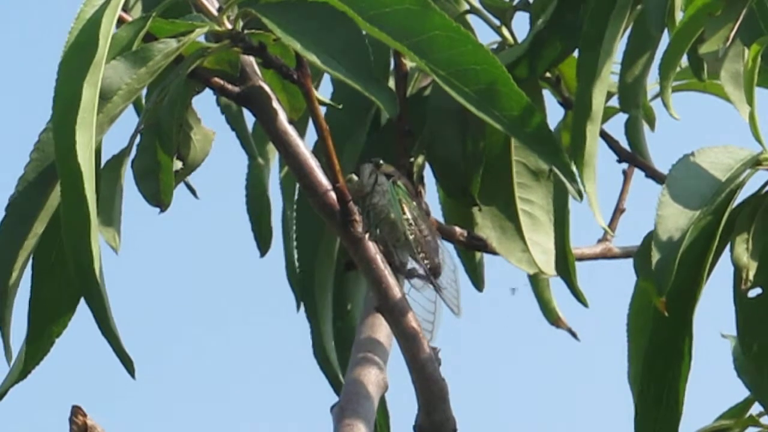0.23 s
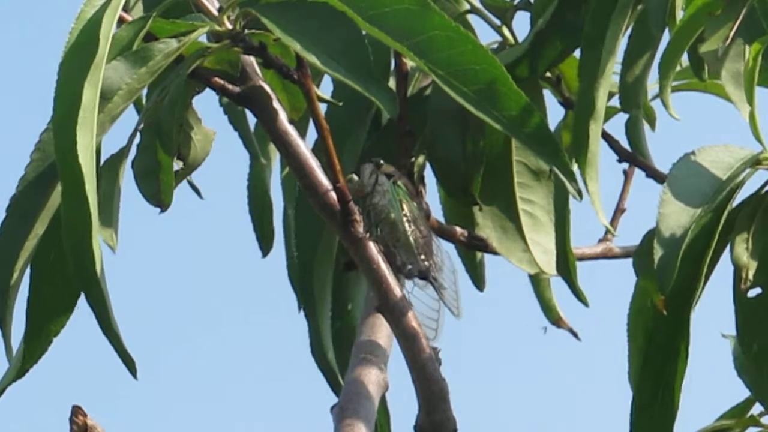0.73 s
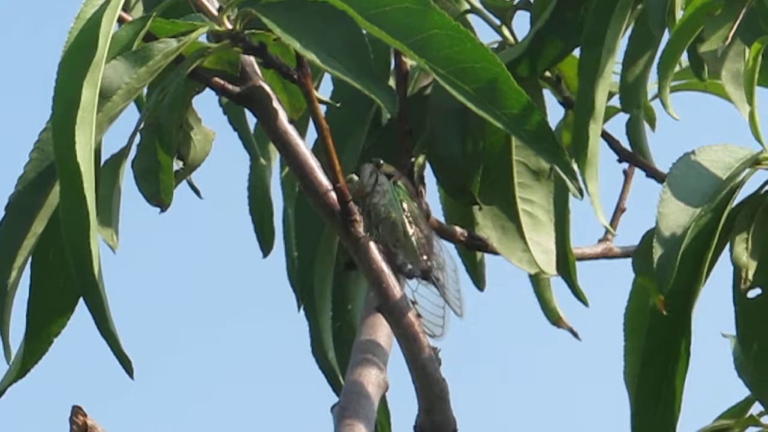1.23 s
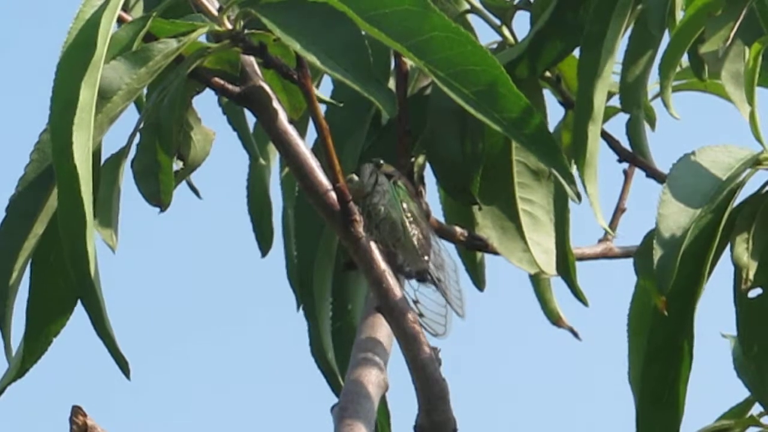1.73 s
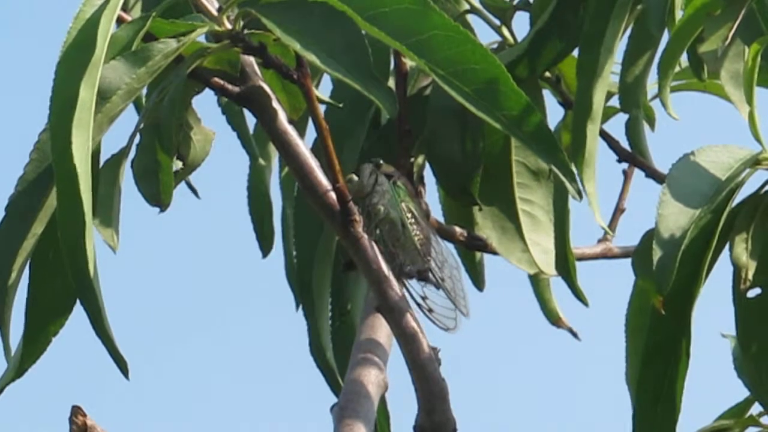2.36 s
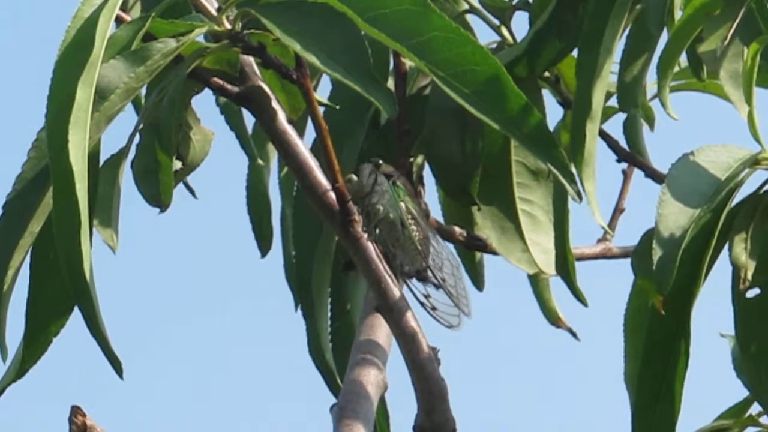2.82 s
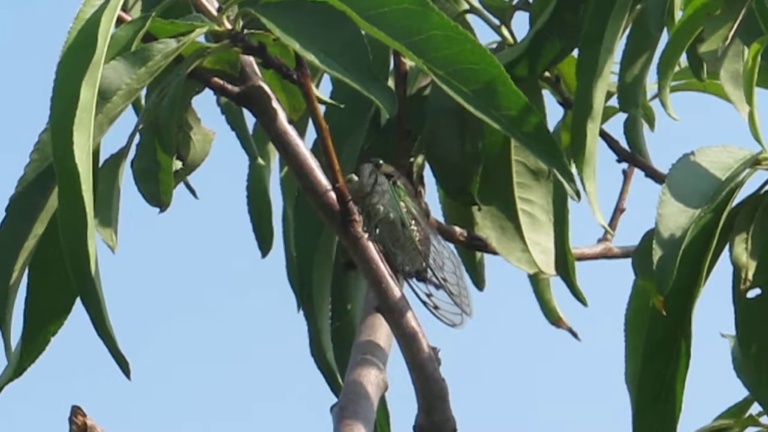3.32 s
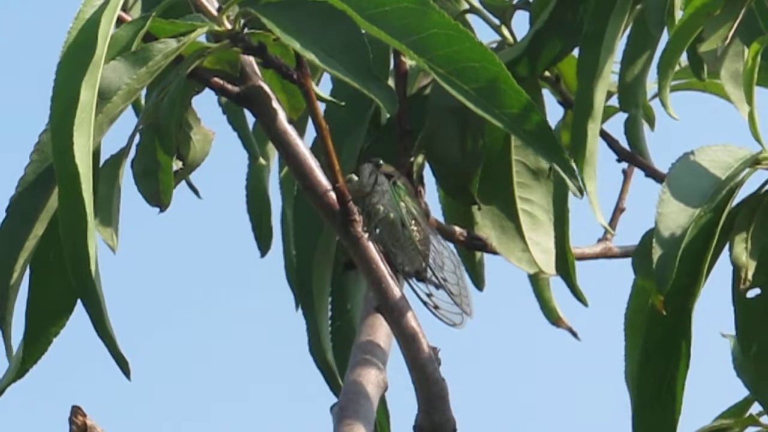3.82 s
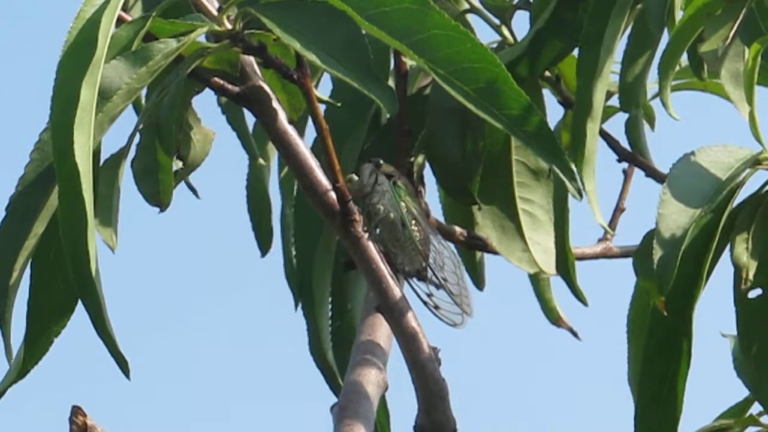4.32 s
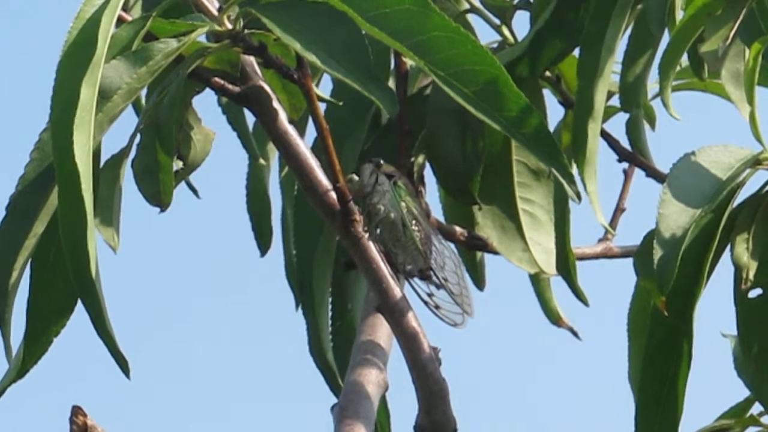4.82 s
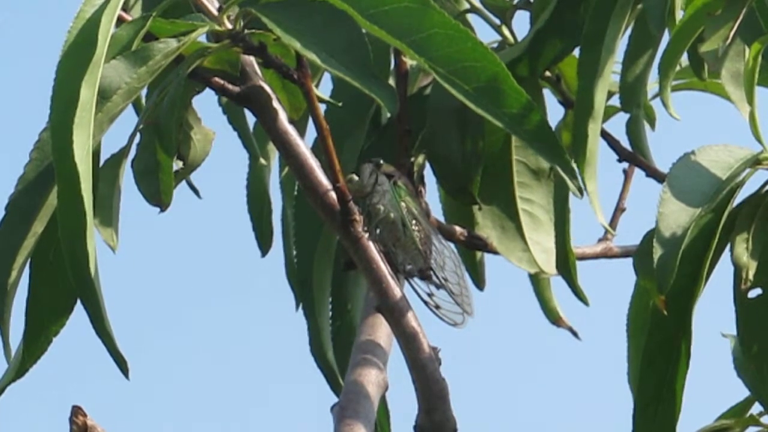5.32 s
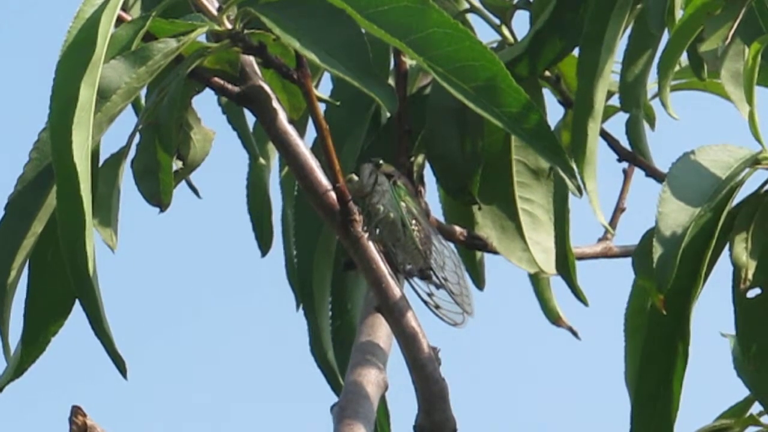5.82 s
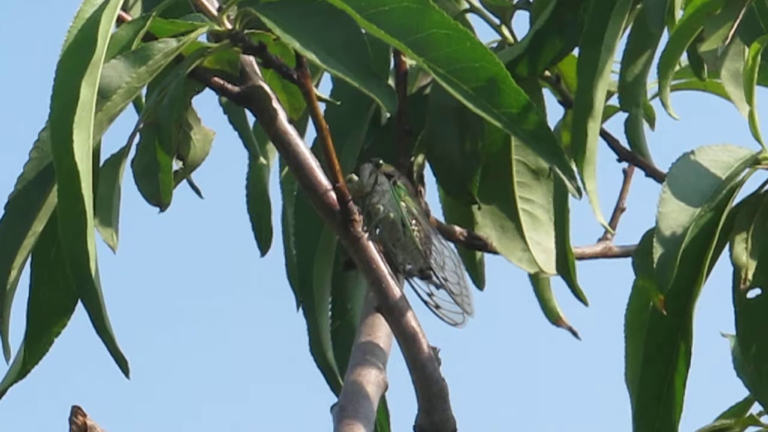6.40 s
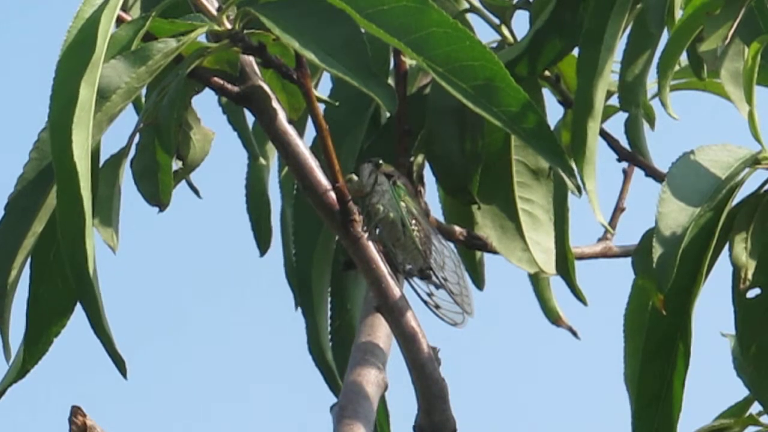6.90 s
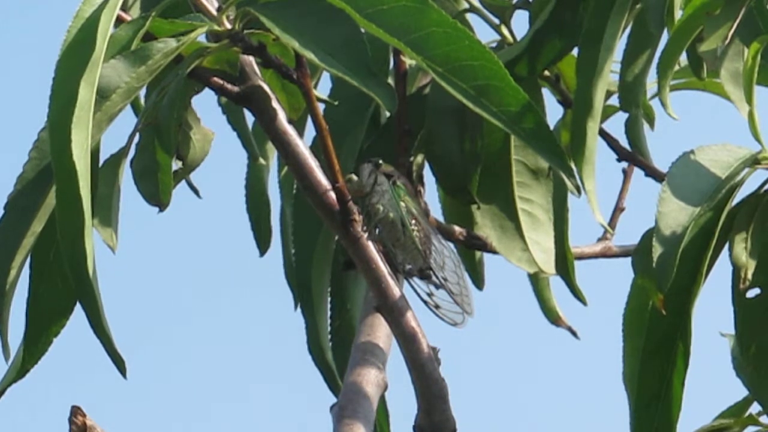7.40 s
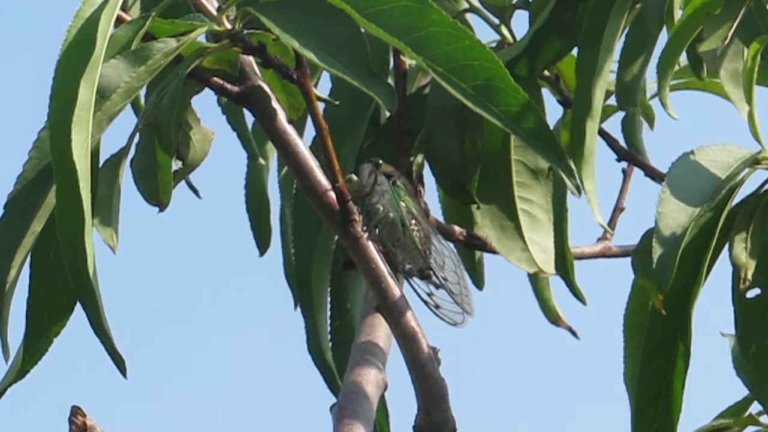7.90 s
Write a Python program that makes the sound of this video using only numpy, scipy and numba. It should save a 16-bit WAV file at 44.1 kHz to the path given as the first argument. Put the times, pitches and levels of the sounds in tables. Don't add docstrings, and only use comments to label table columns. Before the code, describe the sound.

A nearby cicada dominates the first half with a piercing, throbbing buzz. Its individual clicks spread apart, becoming a raspy ratchet, then it stutters in tiny runs and cuts off. The automatic gain has crept up meanwhile, so the second half is a soft open-air bed of low road rumble, uneven far engine drone, faint trilling and chirping insects, and a few barely audible low gliding notes.

```python
import sys
import numpy as np
from scipy import signal
from scipy.fft import rfft, irfft
from scipy.io import wavfile
from scipy.ndimage import uniform_filter1d
from numba import njit

SR = 44100
rng = np.random.default_rng(int(sys.argv[2]) if len(sys.argv) > 2 else 0)


def linear_from_db(decibels):
    return 10 ** (np.asarray(decibels, float) / 20)


def unload_wav(signal):
    wavfile.write(
        sys.argv[1],
        SR,
        np.round(np.clip(np.atleast_2d(signal).T, -1, 1) * 32767).astype(np.int16),
    )


N = 359856
FRESH_PER_S, SPENT_PER_S = 212, 98


def colour(x, table, modes=(), size=1024):
    f = np.arange(size // 2 + 1) * SR / size
    hz, db = np.transpose(table)
    db = np.interp(np.log(f + 1), np.log(hz), db)
    for centre, width, peak_db in modes:
        db = db + peak_db / (1 + (2 * (f - centre) / width) ** 2)
    causal = np.r_[1, 2 * np.ones(size // 2 - 1), 1, np.zeros(size // 2 - 1)]
    fold = irfft(db * np.log(10) / 20) * causal
    return signal.fftconvolve(x, irfft(np.exp(rfft(fold))))[:N]


def unit(x):
    return x / np.sqrt(np.mean(x ** 2))


def clicks(times, sizes):
    at = np.clip(times * SR, 0, N - 2)
    whole = at.astype(int)
    part = at - whole
    return np.bincount(whole, sizes * (1 - part), N) + np.bincount(whole + 1, sizes * part, N)


def walk(rate):
    k = int(SR / rate)
    held = np.repeat(rng.standard_normal(N // k + 1), k)
    return unit(uniform_filter1d(uniform_filter1d(held, k), k)[:N])


@njit
def resonator(x, hz, width):
    y, b, l = np.empty(len(x)), 0., 0.
    for i in range(len(x)):
        g, k = np.tan(np.pi * hz[i] / SR), width / hz[i]
        v = (b + g * (x[i] - l)) / (1 + g * (g + k))
        b, l, y[i] = 2 * v - b, l + 2 * g * v, k * v
    return y


def tire(tired, fresh, spent, bend):
    return fresh + (spent - fresh) * tired ** bend


def tymbal_ribs(t, rate, tired):
    # first stroke in seconds, last stroke in seconds, level in dB.
    stutter = [
        (3.951, 4.010, 0.5),
        (4.023, 4.073, 0),
        (4.088, 4.198, 0),
        (4.217, 4.255, -1),
        (4.281, 4.298, -4),
        (4.312, 4.312, -0.5),
    ]
    pairing_s = (2.7, 3.8)
    runs = [np.linspace(a, b, round((b - a) * SPENT_PER_S) + 1) for a, b, _ in stutter]
    last = np.concatenate(runs)
    last_db = np.repeat(np.transpose(stutter)[2], [len(r) for r in runs])
    beat = np.interp(np.arange(1000), np.cumsum(rate) / SR, t)
    beat = np.r_[beat[beat < last[0] - .003], last]
    size = linear_from_db(np.r_[np.zeros(len(beat) - len(last)), last_db])

    wait = np.interp(beat, pairing_s, (.48, .3)) / np.interp(beat, t, rate)
    stroke = np.r_[beat, beat + wait]
    rebound = stroke + np.r_[wait, wait] / 2
    size = np.r_[size, np.interp(beat, pairing_s, (0.79, 0.7)) * size]

    chance = rng.standard_normal((1000, 8, 2))[:len(beat)]
    chance = chance.T.transpose(1, 0, 2).reshape(8, -1)
    uneven_db = np.interp(stroke, t, tire(tired, 1, 1.6, 1.2))
    belly_ribs, plate_ribs = np.zeros(N), np.zeros(N)
    for k, (ms, db) in enumerate([(.3, 0), (.7, -6)]):
        when = stroke + ms / 1000 + 0.00012 * chance[k]
        belly_ribs += clicks(when, size * linear_from_db(db + uneven_db * chance[k + 4]))
    for k, (ms, db) in enumerate([(.3, 0), (1.5, -9)]):
        when = rebound + ms / 1000 + 0.000141 * chance[k + 2]
        plate_ribs += clicks(when, size * linear_from_db(db + 0.79 * chance[k + 6]))
    return belly_ribs, plate_ribs


def belly_note(cycle, tired):
    top_hz = tire(tired, 7100, 4930, 0.34)
    low_hz = tire(tired, 3040, 3290, 0.41)
    dip = np.sin(np.pi * np.clip(cycle / 0.804, 0, 1) ** 1.01) ** 0.81
    return top_hz - (top_hz - low_hz) * dip


def pump_swell(t, pumps, tired):
    # time in seconds, depth of the pause in dB; the pause slowly fills in.
    pause = [(.85, -11.5), (1.1, -7), (2.1, -1)]
    swell_db = tire(tired, 8, 3, 2.1)
    lead_in = tire(tired, 0, 1.1, 0.39)
    hold = tire(tired, 0.24, .24, .4)
    since = (pumps % 1 + .07) % 1
    left = 1 - since
    shape = np.exp(-(since / hold) ** 3)
    shape += np.minimum(lead_in, 1) * np.exp(-(left / 0.16) ** 2)
    shape += 0.45 * np.exp(-((since - .68) / 0.14) ** 2)
    scatter = 1 + 0.42 * rng.standard_normal(80)[(pumps + .5).astype(int)]
    depth_db = np.interp(t, *np.transpose(pause)) * scatter
    return swell_db * shape + depth_db * np.exp(-(left / 0.17) ** 3)


def microphones(voice, t):
    # time in seconds, nearer delay in ms, farther delay in ms; they move as the camera settles.
    drift = [(0, 1.6, 1.9), (.45, 1.46, 2.06), (1.0, 1.11, 1.83), (1.3, 1.04, 1.705), (4.4, 1.054, 1.691)]
    # nearer reflection in dB, farther in dB.
    echo = [(-23.5, -10), (-15.5, -15.5)]
    # resonance in Hz, width in Hz, left peak in dB, right peak in dB.
    body_modes = [(4750, 330, 9, 5), (6300, 600, 4, 5.5), (6900, 350, 2, 2), (4200, 250, 2, 2)]
    # frequency in Hz, gain in dB.
    song_left = [(2000, -18), (2600, -10), (3200, -6.5), (4000, -3), (4400, -2), (5300, 2), (5800, 1),
                 (6900, -12.5), (7600, -25), (8500, -20), (9500, -40), (11000, -29.5), (13000, -42),
                 (15000, -47.5)]
    song_right = [(2000, -11), (2600, -10), (3200, -5), (4000, -3.5), (4400, -3.5), (5300, -2), (5800, 3.5),
                  (6900, -3.5), (7600, -4), (8400, -5.5), (9500, -15), (11000, -18.5), (13000, -22.5),
                  (15000, -47)]
    low_cut = signal.butter(3, 2100, "high", fs=SR, output="sos")
    sway = 2 * np.pi * 0.5015 * t
    ears = []
    for side, table in enumerate((song_left, song_right)):
        tail = rng.standard_normal((2, 900)) * np.exp(-np.arange(900) / SR / .003)
        tail = tail / np.sqrt(np.sum(tail ** 2) / 2)
        tail = signal.fftconvolve(voice[None], tail, axes=1)[:, :N]
        heard = voice + linear_from_db(-7.5) * (np.cos(sway) * tail[0] + np.sin(sway) * tail[1])
        for db, ms in zip(echo[side], np.transpose(drift)[1:]):
            late = np.arange(N) - np.interp(t, np.array(drift)[:, 0], ms) * SR / 1000
            heard += linear_from_db(db) * np.interp(late, np.arange(N), voice)
        heard = signal.sosfilt(low_cut, heard)
        ears.append(colour(heard, table, [(m[0], m[1], m[2 + side]) for m in body_modes]))
    ears[0] = np.roll(ears[0], 1)
    return np.array(ears)


def cicada(t):
    # time in seconds, strokes per second, level in dB.
    song = [(0, 200, -27.5), (.4, 208, -28), (.6, 209, -27), (1.0, 210, -28.5), (1.6, 190, -30),
            (2.0, 168, -28.5), (2.4, 145, -29), (2.8, 122, -29.5), (3.25, 101, -29.5), (3.32, 129, -27.5),
            (3.6, 114, -28), (4.0, 99, -27), (4.4, 97, -28)]
    # time in seconds with the belly fully open, pumps so far.
    pump = [(-.019, 0), (.230, 4), (.581, 10), (.921, 16), (1.239, 22), (2.472, 45), (2.806, 51),
            (3.157, 57), (3.283, 59), (3.496, 63), (3.793, 68), (4.23, 75), (4.31, 76), (4.4, 77)]
    song_s, song_rate, song_db = np.transpose(song)
    rate = np.interp(t, song_s, song_rate)
    level_db = np.interp(t, song_s, song_db)
    tired = np.clip((FRESH_PER_S - rate) / (FRESH_PER_S - SPENT_PER_S), 0, 1)
    belly_ribs, plate_ribs = tymbal_ribs(t, rate, tired)

    pumps = np.interp(t, *np.transpose(pump))
    belly_hz, plate_hz = belly_note(pumps % 1, tired), np.full(N, 6900.)
    belly = resonator(resonator(belly_ribs, belly_hz, 1500.), belly_hz, 1500.)
    plate = resonator(resonator(plate_ribs, plate_hz, 3200.), plate_hz, 3200.)
    knock = resonator(belly_ribs, np.full(N, 3600.), 1020.)
    edge = np.diff(belly_ribs - plate_ribs, prepend=0)
    high_pass = signal.butter(4, 9000, "high", fs=SR, output="sos")
    snap = signal.sosfilt(high_pass, belly_ribs + plate_ribs)

    voice = linear_from_db(tire(tired, -0.5, -4.5, 4)) * unit(belly)
    voice += linear_from_db(tire(tired, 5, 3.5, 1.9)) * unit(plate)
    voice += linear_from_db(tire(tired, -11, -0.5, 1.1)) * unit(knock)
    voice += linear_from_db(-12) * unit(edge)
    voice += linear_from_db(tire(tired, -2, 6.5, 1.2) + 3.5) * unit(snap)
    voice *= linear_from_db(pump_swell(t, pumps, tired))
    ring_gain = linear_from_db(np.interp(t, (0.61, 1.27), (-4, 0.5)))
    voice += (ring_gain - 1) * resonator(voice, np.full(N, 4700.), 300.)
    return unit(microphones(voice, t)) * linear_from_db(level_db + 3.0)


def chirps(times, db, hz0, hz1, length_s, buzz_hz=0., buzz=0., rough=0., spread=.01):
    u = np.arange(int(length_s * SR)) / SR
    out = np.zeros(N + len(u))
    glide = hz0 * u + (hz1 - hz0) * u ** 2 / (2 * length_s)
    chance = rng.standard_normal((len(times), 2))
    for s, gain, (detune, turn) in zip(times - length_s / 2, linear_from_db(db), chance):
        tone = np.sin(2 * np.pi * (1 + spread * detune) * glide)
        shape = np.sin(np.pi * u / length_s) ** 0.58
        shape *= 1 + buzz * np.cos(2 * np.pi * buzz_hz * u + 3 * turn)
        grit = np.convolve(rng.standard_normal(len(u)), np.hanning(70), "same")
        shape *= 1 + rough * unit(grit)
        i = int(s * SR)
        if 0 <= i < N:
            out[i:i + len(u)] += gain * tone * shape
    return out[:N]


def fast_chirper():
    strokes = 0.0068 + np.arange(240) / 29.3
    chance = rng.standard_normal((240, 2)).T
    times = strokes + .0008 * chance[0]
    fast = chirps(times, -3.0 + 0.74 * chance[1], 8630, 7640, .015, 200.0, 0.32, rough=0.28)
    tick = clicks(strokes - .006, linear_from_db(-16 + 6 * rng.standard_normal(240)))
    scrape = rng.standard_normal(200) * np.exp(-np.arange(200) / 90)
    tick = resonator(np.convolve(tick, scrape)[:N], np.full(N, 11000.), 4600.0)
    return fast, tick


def trillers():
    high_trill = [4.426, 4.6, 4.772, 4.93, 5.073, 5.257, 5.542, 5.737, 5.862, 6.026, 6.164, 6.322, 6.593,
                  6.727, 6.864, 7.24, 7.38, 7.752, 8.056]
    low, high = .058 + np.arange(45) / 5.508, np.array(high_trill)
    low_db, high_db = np.full(45, -59.5), -53 - 4.5 * (high - high[0])
    return [chirps(s, db + 35.5, hz, hz * .99, 0.062, 141.85, 0.64, rough=0.6, spread=.003)
            for s, db, hz in ((low, low_db, 9050), (high, high_db, 9850))]


def far_buzzer():
    beats = np.arange(640) / 77.3
    db = -10.5 + 3.5 * np.sin(2 * np.pi * 12.3 * beats) + 1.5 * rng.standard_normal(640)
    db += 3 * np.exp(-((beats - 6.2) / 0.64) ** 2)
    return chirps(beats, db, 6120, 5286, .006, spread=.025)


def insects():
    fast, tick = fast_chirper()
    low, high = trillers()
    far = far_buzzer()
    left = linear_from_db(-26.0) * fast + low + linear_from_db(-18.0) * high + np.roll(far, 5)
    right = fast + tick + linear_from_db(7.0) * low + high + linear_from_db(-4.5) * far
    pair = np.array([left, right])
    tail = rng.standard_normal((2, 3000)) * np.exp(-np.arange(3000) / SR / 0.015)
    return pair + linear_from_db(-47) * signal.fftconvolve(pair, tail, axes=1)[:, :N]


def low_notes():
    # time in seconds, level in dB, start in Hz, end in Hz, length in seconds.
    coos = [
        (5.08, -37, 352, 360, .2),
        (5.766, -37.5, 239, 253, .22),
        (6.11, -37.5, 252, 257, .2),
        (6.353, -41, 340.6, 347, .2),
    ]
    return sum(chirps(np.array([s]), np.array([db]), *note) for s, db, *note in coos)


def engine_hum(t, gain_db):
    # pull starts in seconds, ends in seconds, rise in dB.
    hum_load = [
        (1.5, 2.25, 7),
        (2.45, 3.5, 4),
        (3.6, 4.751, 10.5),
        (6.3, 7.1, 4),
        (7.25, 7.6, 3),
        (7.65, 8.3, 15.5),
    ]
    hum_hz = 143.8 - 2.2 * np.maximum(t - 5.0, 0)
    ramp_s = 0.059
    load_db = sum(db * np.clip(np.minimum(t - a, b - t) / ramp_s + .5, 0, 1) for a, b, db in hum_load)
    tone = np.sin(2 * np.pi * np.cumsum(hum_hz + 1.524 * walk(8.1)) / SR)
    return tone * linear_from_db(gain_db - 6 + load_db + 2.5 * walk(7.6))


def traffic(t):
    # heavy vehicle's time in seconds, bass swell in dB.
    rumble = [(.2, 3), (2.1, 3), (3.1, 3), (3.5, 5), (4.0, 6), (4.55, 4), (5.2, 5), (6.15, 3.5), (7.1, 2),
              (7.7, 1), (8.05, 3.5)]
    # frequency in Hz, likeness of left and right 0-1.
    likeness = [(60, 1), (300, 1), (640, 0.98), (1400, 0.9), (3000, 0.4), (5000, 0.16), (9000, 0.3)]
    # frequency in Hz, level in dB per Hz.
    road_left = [(30, -2.5), (60, 9.5), (120, 9), (200, -2), (450, -4.5), (800, 1), (1400, -4.5),
                 (2500, -17), (4000, -23.5), (6000, -22.5), (7500, -36), (9500, -41), (11000, -45),
                 (15000, -48)]
    road_right = [(30, 2), (60, 12.5), (120, 12), (200, 0), (450, -3.5), (800, 2.5), (1400, -2),
                  (2500, -15), (4000, -27), (6000, -22), (7500, -20.5), (9500, -31.5), (11000, -39.5),
                  (15000, -46)]
    rumble_db = sum(db * np.exp(-((t - s) / 0.19) ** 2) for s, db in rumble)
    f = np.arange(N // 2 + 1) * SR / N
    like_hz, like = np.transpose(likeness)
    like = np.clip(np.interp(np.log(f + 1), np.log(like_hz), like), 0, 1)
    lag_samples = 3 + 3 / (1 + (f / 500) ** 2)
    late = np.exp(-2j * np.pi * f / SR * lag_samples)
    bass = 1 / (1 + (f / 160) ** 4)
    shared, ears = rng.standard_normal(N), []
    for lag, table in ((late, road_left), (1, road_right)):
        noise = np.sqrt(like) * rfft(shared) * lag
        noise = noise + np.sqrt(1 - like) * rfft(rng.standard_normal(N))
        hz, db = np.transpose(table)
        noise = noise * linear_from_db(np.interp(np.log(f + 1), np.log(hz), db, left=-8))
        ears.append(irfft(noise * (1 - bass), N) + irfft(noise * bass, N) * linear_from_db(rumble_db))
    return np.array(ears)


def camera_gain(t):
    start_db, full_db = -48, -32.5
    return start_db + (full_db - start_db) * np.clip(t / 4.16, 0, 1) ** 1.25


def scene():
    t = np.arange(N) / SR
    gain_db = camera_gain(t)
    hum = engine_hum(t, gain_db)
    road = traffic(t) * linear_from_db(gain_db + 15.0)
    tones = (hum + low_notes()) * linear_from_db(np.array([[-1.2], [1.2]]))
    return cicada(t) + road + tones + insects() * linear_from_db(gain_db)


def low_pass(x):
    return signal.sosfilt(signal.butter(12, 15710, fs=SR, output="sos"), x)


def record(dry):
    return low_pass(dry)


dry = scene()
out = record(dry)
unload_wav(out)
```